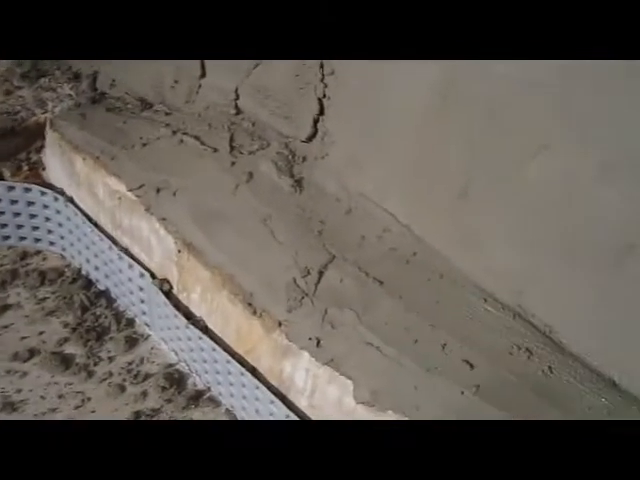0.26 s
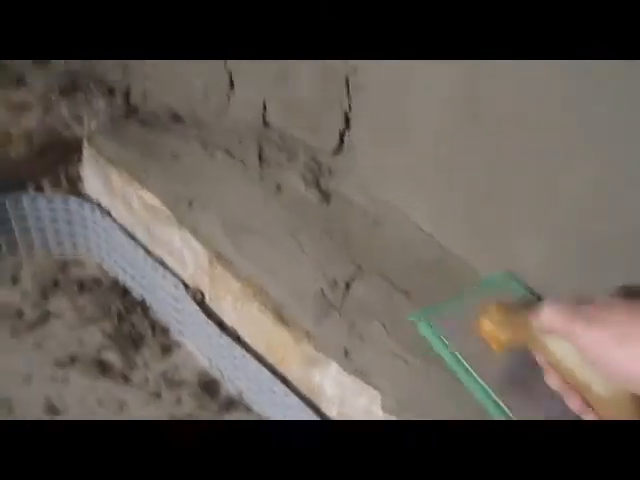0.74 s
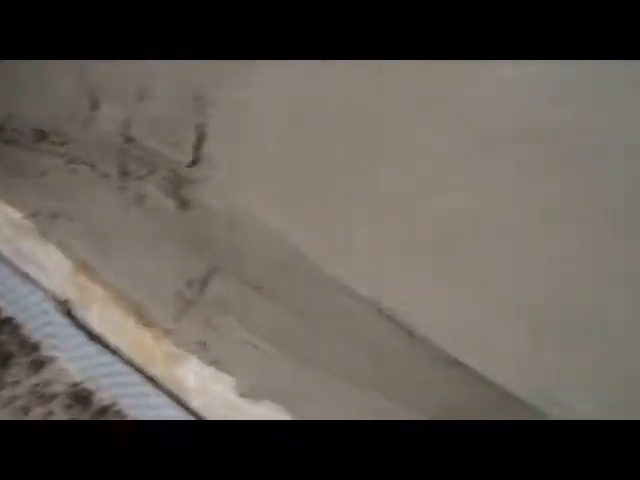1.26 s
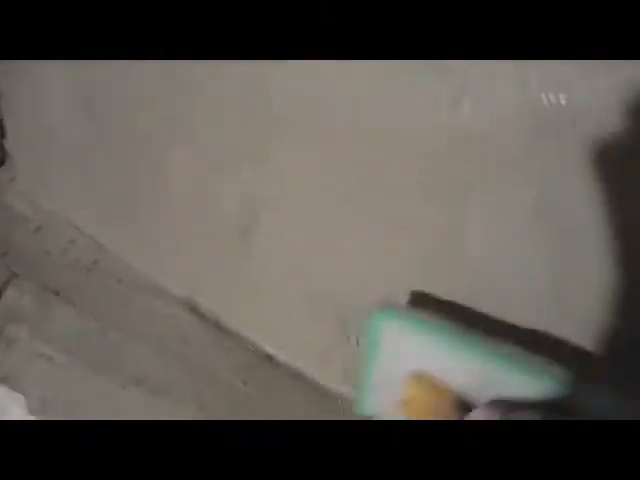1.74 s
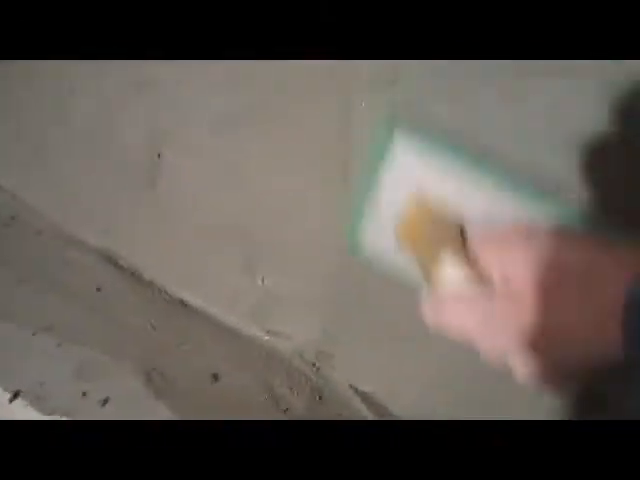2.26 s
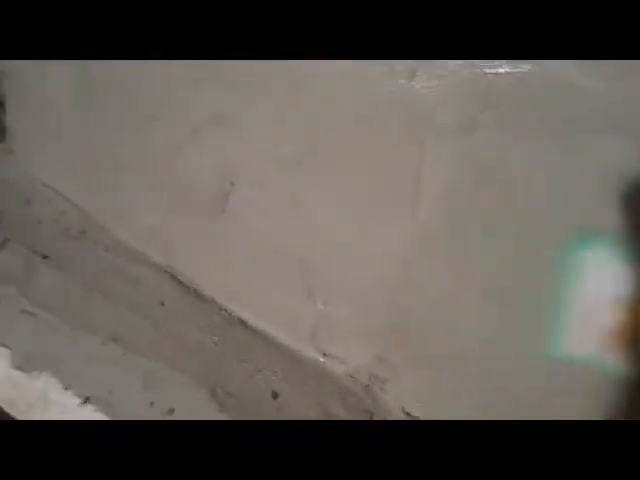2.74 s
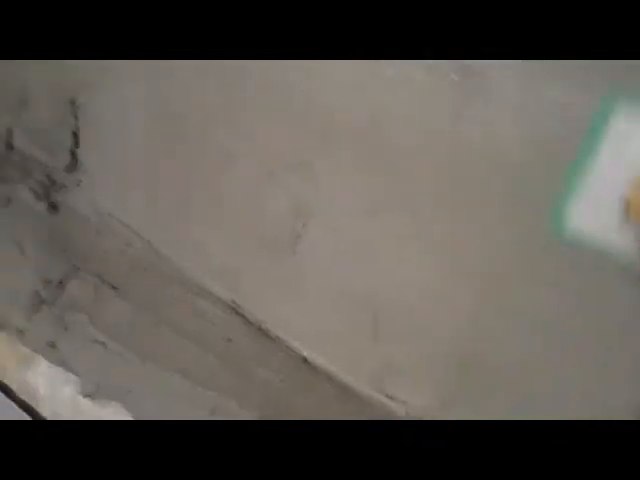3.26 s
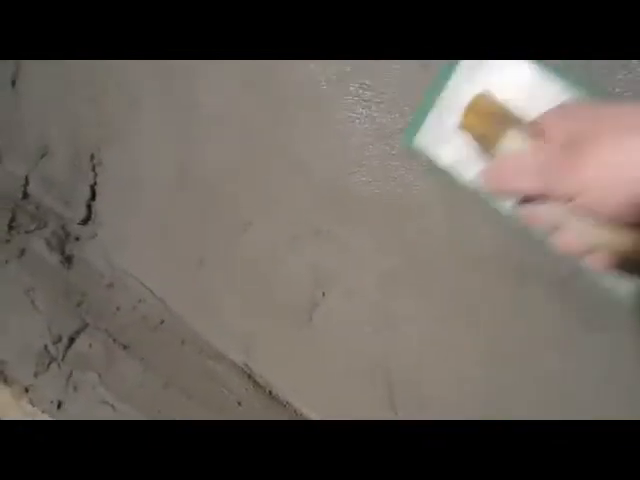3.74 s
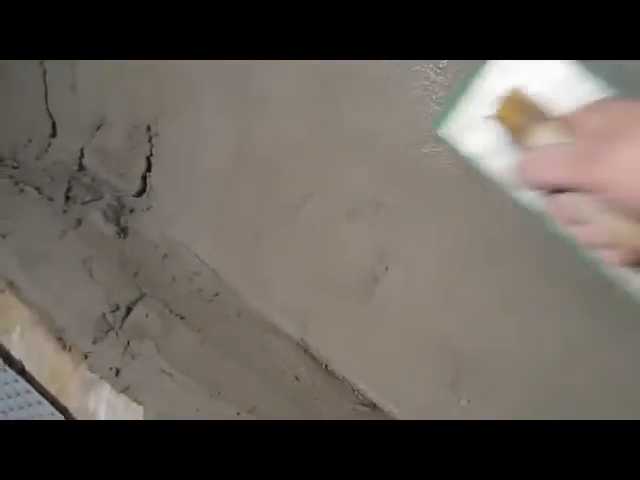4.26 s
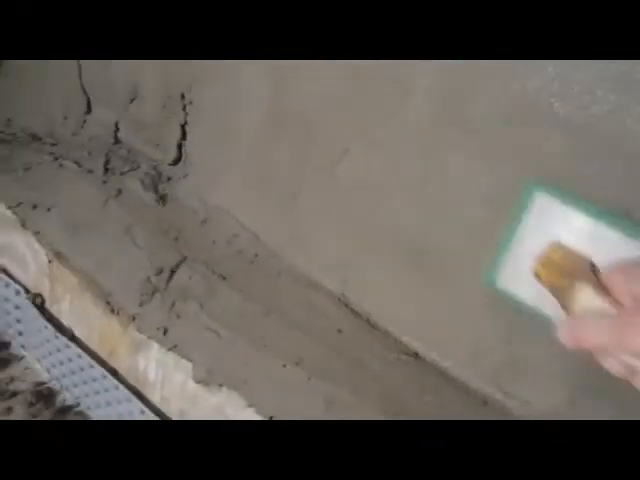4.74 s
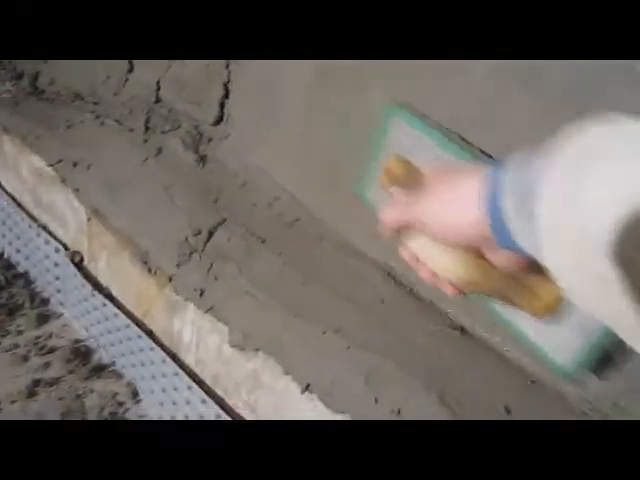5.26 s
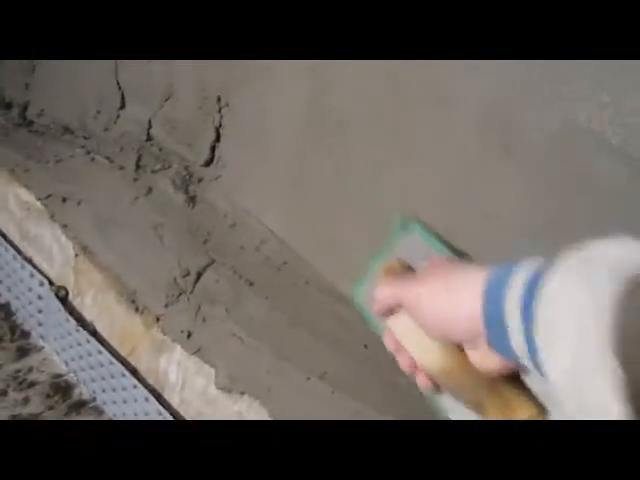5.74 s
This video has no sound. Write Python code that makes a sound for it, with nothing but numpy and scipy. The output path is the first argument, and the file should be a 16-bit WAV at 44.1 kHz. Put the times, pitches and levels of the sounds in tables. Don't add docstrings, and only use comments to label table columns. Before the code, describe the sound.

Close to a small mono microphone outdoors, a sponge float rubs wet cement in uneven sandy strokes. A thin wavering squeak comes first, then dry edge knocks and heavier scrapes. Steadier swishing circles follow, until a loud, crackling gust batters the microphone and nearly hides the rubbing. Quiet scraping returns at the end.

```python
import sys
import numpy as np
from scipy import signal
from scipy.fft import rfft, irfft, next_fast_len
from scipy.io import wavfile
from scipy.ndimage import uniform_filter1d

SR = 44100
rng = np.random.default_rng(int(sys.argv[2]) if len(sys.argv) > 2 else 0)


def elevation(decibels):
    levels = np.asarray(decibels, float)
    return 10 ** (levels / 20)


def dump_mix(stems):
    frames = np.atleast_2d(stems).T
    limited = np.clip(frames, -1, 1)
    pcm = np.round(limited * 32767).astype(np.int16)
    wavfile.write(sys.argv[1], SR, pcm)


N = 264732
T = np.arange(N) / SR
STEP = T[::64]


def unit(x):
    return x / np.sqrt(np.mean(x ** 2))


def curve(table):
    s, *columns = np.transpose(table)
    return [np.interp(T, s, c) for c in columns]


def colour(table, hz):
    f, db = np.transpose(table)
    return np.interp(np.log(hz), np.log(f), db)


def band(x, hz, width, order=2):
    edges = [hz - width / 2, min(hz + width / 2, .45 * SR)]
    return signal.sosfilt(signal.butter(order, edges, "band", fs=SR, output="sos"), x)


def walk(rate):
    k = int(SR / rate)
    held = np.repeat(rng.standard_normal(N // k + 1), k)
    return 1.57 * uniform_filter1d(uniform_filter1d(held, k), k)[:N]


def add(out, s, piece):
    i = int(s * SR)
    out[i:i + len(piece)] += piece[:N - i]


# (middle [s], length [s], grit peak [dB], press:
# thick drag over the grit [dB], plate ring over the grit [dB])
STROKES = [(0.094, 0.1, -42.5, -17, -17), (0.214, 0.2, -39, -13, -3), (0.41, 0.062, -41, -21, -9),
           (0.636, 0.076, -45.5, 6.5, 3), (0.712, 0.11, -68.5, 10, 20), (0.854, 0.068, -51, 6, 5),
           (0.982, 0.1, -41, -13.5, -2), (1.077, 0.16, -39, -32, -1), (1.196, 0.067, -40.5, -21, -3),
           (1.275, 0.092, -47.5, -5, 5.5), (1.392, 0.07, -29.5, -4, 1), (1.452, 0.063, -34.5, 8.5, 5),
           (1.493, 0.085, -25.5, -5.5, -3), (1.583, 0.1, -46.5, 2, 6.5), (1.691, 0.039, -50.5, 5, 10),
           (1.723, 0.049, -36.5, 4, 8), (1.761, 0.066, -48.5, 7, 9), (1.87, .09, -54.5, 3, -5),
           (1.98, 0.069, -42, -16, -4), (2.23, 0.22, -33, -12.5, -8), (2.4, 0.14, -43, -9, 1),
                (2.54, 0.084, -34.5, -7.5, -12), (2.67, 0.14, -35.5, -15, -3.5),
                (2.95, 0.12, -37.5, -21, -2), (3.071, 0.12, -32.5, -21, 0), (3.2, 0.094, -34.5, -20, -2.5),
                (3.412, 0.22, -36, -21, -4.5), (3.608, 0.096, -41, -19, 6), (3.82, 0.16, -38, -15, -13),
                (3.99, 0.15, -34, -22, -2), (4.228, 0.17, -35.5, -20, -5.5), (4.44, .2, -37.5, -20, -5),
                (4.66, 0.2, -38.5, -14.5, -8), (4.86, 0.1, -46, 4.5, -7), (5.771, 0.094, -63, 1, 6),
                (5.85, 0.095, -46, -9, -14), (6.0, 0.12, -42, -3.5, -9.5)]
# (time [s], grit level [dB], press [dB])
CONTACT = [(0, -45, 0), (.45, -43, -6.5), (.55, -50, 1.5), (.77, -58, 5.5), (.9, -47, -4.5),
           (1.3, -46.5, 6), (1.66, -56, 8), (1.87, -50.5, 2.5), (2.04, -41, -8), (2.8, -41.5, -14),
           (4.8, -46.5, -17.5), (4.98, -54.5, -25), (5.24, -58.5, -11), (5.43, -52.5, -14),
           (5.53, -67.5, -4), (5.67, -71.5, 14), (5.78, -51, -5), (6.0, -64, 18)]


def strokes():
    rise_share, spray_length = 0.9, 0.86
    spray_per_press = -0.3
    db, press = (c[::64] for c in curve(CONTACT))
    spray = -6.5 + spray_per_press * press + 0.19 * (db + 45.0)
    power = elevation(2 * (db + np.array([press, 0 * db - 2.5, 0 * db, spray])))
    for s, length, db, press, ring in STROKES:
        u = 2 * (STEP - s) / length / np.where(STEP < s, rise_share, 2 - rise_share)
        bell = np.exp(-u ** 2)
        bells = [bell, bell, bell, bell ** (1 / spray_length ** 2)]
        spray = -12 + spray_per_press * press - 0.33 * (db + 37.5) + 0.16 * (ring + 4)
        power += elevation(2 * (db + np.array([[press], [ring], [0], [spray]]))) * bells
    return np.array([np.interp(T, STEP, 10 * np.log10(p)) for p in power])


RUB_HZ = (280, 1500, 5500, 12000)
RUB_WIDTH_HZ = (480, 1800, 5500, 5000)
# (frequency [Hz], level [dB])
GRIT = [(60, -14.5), (120, -8), (280, 0.5), (600, 0), (1300, 2.5), (2500, 1), (4000, 2), (7000, 3.5),
        (10000, 3), (12500, 2), (14000, -5), (15300, -8.5)]


def rub(layers_db, patchy_db=1.36, patch_rate=12.):
    per_hz = layers_db - 10 * np.log10(RUB_WIDTH_HZ)[:, None]
    size = next_fast_len(N)
    noise = rng.standard_normal(N)
    bursts_db = 1.5 * rng.exponential(1, N) + .8 * walk(60)
    grains = rfft(n=size, x=unit(noise * elevation(bursts_db)))
    octave = np.log2(np.maximum(np.arange(len(grains)), 1) * SR / size)
    out, shared = 0, walk(19.0)
    for hz in 60 * 2 ** np.arange(0, 8.1, .25):
        place = np.interp(np.log(hz), np.log(RUB_HZ), range(4))
        k = min(int(place), 2)
        layer_db = per_hz[k] + (place - k) * (per_hz[k + 1] - per_hz[k])
        db = layer_db + colour(GRIT, hz) + 10 * np.log10(SR / 2)
        shared = 0.51 * shared + 0.82 * walk(patch_rate)
        slot = np.maximum(1 - 4 * abs(octave - np.log2(hz)), 0)
        out = out + elevation(db + patchy_db * shared) * irfft(grains * slot, size)[:N]
    return out


def pores(grit_db, count=700, under_db=-17., glide=.04):
    out = np.zeros(N)
    for s, pitch, long, bend, size in rng.random((count, 5)):
        t = T[:int(SR * (.02 + .05 * long))]
        hz = 500 * 2 ** (4.8 * pitch) * (1 + glide * (2 * bend - 1) * t / t[-1])
        whistle = np.hanning(len(t)) * np.sin(2 * np.pi * np.cumsum(hz) / SR)
        add(out, s * N / SR, elevation(3.3 * size) * whistle)
    return out * elevation(grit_db + under_db)


# (frequency [Hz], level [dB per Hz])
AIR = [(12, -37), (20, 9.5), (128, -3), (288, -13), (316, -9), (392, -10), (500, -3.5), (650, -38),
       (1100, -120)]
# (time [s], level [dB])
DUCK = [(0, 1), (2.55, 1.5), (2.75, 3.5), (3.4, 3.5), (3.9, 4), (4.2, 2.5), (4.5, 1.5), (4.8, 4),
        (4.9, -13.5), (5.62, -15), (5.76, -5.5), (6.01, -4)]


def air():
    hz = np.maximum(np.arange(N // 2 + 1) * SR / N, 1)
    rumble = irfft(rfft(rng.standard_normal(N)) * elevation(colour(AIR, hz)), N)
    return unit(rumble) * elevation(-53 + curve(DUCK)[0] + 1.5 * walk(8.))


# (middle [s], length [s], frequency [Hz], level [dB], glide [octaves per s])
RINGS = [(0.07, 0.038, 1700, -42, -0.8), (0.07, 0.14, 373, -47, -0.7), (0.162, .12, 1397, -41.5, 1.7),
         (0.941, 0.19, 4220, -43, 1.5), (1.06, 0.16, 6500, -41, -0.5), (1.296, 0.027, 3060, -32.5, -2),
         (1.365, 0.029, 1520, -33, -3.5), (1.394, 0.072, 3116, -24.5, 0), (1.408, 0.032, 3850, -27, 0.5),
         (1.5, 0.08, 559, -35, 0.5), (1.492, 0.25, 924, -31, -.3), (1.721, 0.059, 2020, -38, 4),
         (1.752, 0.11, 453, -34, -0.1), (1.959, 0.14, 1595, -47, 1.5), (2.171, 0.12, 4600, -38, -2),
         (2.223, 0.057, 2270, -40, 3.5), (2.25, 0.1, 1268, -38.5, -0.2), (2.309, 0.077, 3300, -36, 0),
         (2.46, 0.1, 3900, -48, -1), (2.65, 0.048, 2160, -42, 3), (2.664, 0.092, 3930, -34, 4),
         (3.005, 0.19, 2415, -36.5, 0), (3.03, 0.06, 4000, -31.5, -0.5), (3.089, 0.065, 3010, -33.5, 1.5),
         (3.122, 0.22, 1199, -40.5, 2.5), (3.158, 0.052, 6750, -33.5, 2), (3.39, 0.06, 2720, -38, -1),
         (3.454, 0.096, 1300, -41, -.7), (3.612, 0.13, 1410, -46, 1), (3.821, 0.12, 3110, -40, 1),
         (3.92, 0.2, 1605, -40.5, 0.5), (3.96, .1, 3100, -46, 1), (4.0, 0.086, 5320, -42, 2.5),
         (4.165, 0.11, 2070, -37.5, .7), (4.186, 0.076, 2910, -36, 0.5), (4.345, 0.05, 1600, -36.5, 0.5),
         (4.377, 0.12, 3420, -38, 2.2), (4.474, 0.16, 6000, -40, 0.5), (4.63, 0.13, 1510, -43, .1),
         (5.795, 0.13, 1424, -48, .1)]
PATCHES = [(.62, .05, 770, -45, -1.5), (.64, .04, 330, -39, 0), (.652, 0.026, 1520, -38, 0),
           (1.42, .03, 402, -28, 0.5), (1.52, 0.064, 720, -34, 0), (1.739, .05, 600, -35, -6.5),
           (1.72, .04, 249, -38, 0), (2.226, .04, 1280, -37.5, 1), (2.278, .03, 1250, -36, 0),
           (2.705, .03, 1250, -40, 0.5), (2.98, .05, 2450, -42, -0.5), (3.08, 0.041, 1002, -40, 0.5),
           (3.382, .04, 2000, -40, -0.5), (3.599, 0.073, 1304, -40, 0), (3.905, .035, 1600, -36, -1),
           (4.02, .04, 1500, -45, 1), (4.097, .025, 1200, -40, 0), (4.211, 0.085, 1350, -42, 0),
           (4.22, 0.053, 1800, -40, 0), (4.34, .05, 1200, -42.5, 1), (4.51, 0.088, 1700, -42.5, 0.5),
           (5.783, 0.026, 1450, -51, -2.5), (5.824, 0.0346, 1400, -50, -3.5), (5.98, .05, 800, -45, 1),
           (5.904, 0.13, 330, -49, 0), (.03, 0.055, 340, -44, 0.5), (3.78, 0.13, 4620, -45, -0.5),
           (1.303, .1, 3300, -43, 0)]
WHISTLES = [(0.15, .05, 5600, -46, -2), (0.2, .06, 5600, -44, 0), (.27, .03, 5900, -46, 2),
            (0.18, .1, 3800, -49, 0), (2.65, 0.045, 2150, -40, 0), (4.46, .05, 6400, -45, 1),
            (4.515, .04, 6050, -45, -1), (4.64, .08, 1500, -45, 0.5), (4.385, .04, 3350, -45, -0.5)]


def rings(grit_db, table, sharp=7., lift_db=-1.5, flicker_db=2.):
    out = np.zeros(N)
    for s, length, hz, db, glide in table:
        i, n = int(max(s - length, 0) * SR), int(2 * length * SR)
        t = T[:n] - length
        narrow = signal.butter(2, hz / sharp / 2, fs=SR, output="sos")
        sway = signal.sosfilt(narrow, rng.standard_normal((2, 24000)))[:, -n:]
        phase = 2 * np.pi * np.cumsum(hz * 2 ** (glide * t)) / SR
        hiss = unit(sway[0] * np.cos(phase) + sway[1] * np.sin(phase))
        hiss = (hiss * np.hanning(n) ** 1.4)[:N - i]
        stroke_db = np.minimum(grit_db[i:i + n] - grit_db[int(s * SR)], 0)
        add(out, i / SR + 1e-6, elevation(db + lift_db + stroke_db) * hiss)
    return out * elevation(flicker_db * walk(45.))


# (time [s], slip rate [Hz], level [dB])
SQUEAKS = [
    [(.06, 2660, -60), (.08, 2700, -46), (.126, 2790, -43), (.165, 2820, -44), (.188, 2930, -43),
     (.21, 2790, -44), (.235, 2830, -43), (.27, 2780, -45), (.3, 2680, -43), (.335, 2430, -43),
     (.365, 2520, -45), (.38, 2600, -56), (.41, 2750, -52), (.46, 3000, -56)],
    [(1.8, 4300, -70), (1.835, 4750, -60), (1.86, 5250, -57), (1.89, 5500, -56), (1.93, 5330, -60)],
    [(5.64, 5500, -86), (5.66, 5900, -77), (5.695, 6600, -69), (5.73, 7050, -70), (5.76, 7350, -74)],
    [(5.87, 1280, -78), (5.91, 1380, -62), (5.965, 1500, -58), (6.0, 1470, -60)],
]
# (first [dB], second [dB], higher overtones [dB], half lines [dB])
SQUEAK_TONES = [(0, -2, -30, -10), (-3, 2, -5, -4), (0, -16, -30, -60), (-18, -13, 0, -60)]


def squeaks(rough=.006, flutter_db=3.5):
    out = 0
    for table, tones in zip(SQUEAKS, SQUEAK_TONES):
        hz, db = curve(table)
        phase = 2 * np.pi * np.cumsum(hz * (1 + rough * walk(300.))) / SR
        on = (T > table[0][0]) & (T < table[-1][0])
        for k in np.arange(1, int(31000 / hz.max()) + 1) / 2:
            tone_db = tones[3 if k % 1 else min(int(k), 3) - 1]
            out = out + on * elevation(db + tone_db + flutter_db * walk(70.)) * np.sin(k * phase)
    return out


# (time [s], lowest [Hz], highest [Hz])
FILLS = [(.295, 4700, 6300), (1.225, 4700, 6300), (1.225, 11800, 13700), (2.105, 8400, 9700),
         (2.76, 6300, 8300), (3.715, 9000, 10300), (4.755, 4200, 5200), (4.755, 5700, 6900),
         (4.755, 11200, 12400), (4.755, 13900, 15100)]


def fills():
    length_s = .046
    out, n = np.zeros(N), int(length_s * SR)
    for s, low_hz, high_hz in FILLS:
        noise = rng.standard_normal(3 * n)
        hiss = unit(band(noise, (low_hz + high_hz) / 2, high_hz - low_hz, order=6)[-n:])
        db = -43. - low_hz / 1000
        add(out, s - length_s / 2, elevation(db) * hiss * np.sqrt(np.hanning(n)))
    return np.array([out, -out])


# (time [s], ring peak [dB], ring [Hz], thud peak [dB], thud [Hz])
TAPS = [(.488, -24, 1350, -54, 200), (.525, -37, 3900, -60, 200), (.537, -32.5, 2730, -55, 200),
        (0.546, -37, 2600, -60, 200), (.568, -35.5, 3400, -60, 200), (0.649, -20.5, 1320, -21, 123),
        (.674, -26.5, 2500, -30, 149), (.695, -25.5, 1370, -50, 150), (.718, -27, 1390, -34, 150),
        (0.727, -35, 1400, -53, 150), (.734, -35, 1500, -55, 150), (0.816, -14.5, 1315, -53, 300),
        (1.342, -21, 2600, -24, 251), (1.362, -22, 1520, -40, 250), (1.41, -11, 1260, -13, 310),
        (1.465, -20, 1360, -14, 182), (1.648, -29, 2200, -45, 400), (1.681, -33, 2300, -45, 400),
        (1.722, -22, 2210, -25, 460), (4.174, -35, 700, -27.5, 338), (4.555, -32, 755, -26, 184)]
# (time [s], level [dB], lowest [Hz], highest [Hz])
TICKS = [
    (1.677, -45, 6000, 14000),
    (5.535, -39, 3000, 8500),
]


def taps():
    t60_s, push_s, tick_s = 0.0076, 0.0004, .003
    out, t = np.zeros(N), T[:4000]
    for s, db, hz, thud_db, thud_hz in TAPS:
        fade = np.exp(-np.log(1000) * t / t60_s)
        ring = -2.5 * fade * np.sin(2 * np.pi * hz * t)
        overtone = -1.54 * np.exp(-t / 0.00062) * np.sin(2 * np.pi * 1.77 * hz * t)
        tail = 0.13 * np.exp(-t / 0.025) * unit(band(rng.standard_normal(len(t)), hz, 0.53 * hz))
        thud = -np.exp(-t * thud_hz / 0.9) * np.sin(2 * np.pi * thud_hz * t)
        push = 1 - np.exp(-t / push_s)
        add(out, s, elevation(db) * (ring + overtone + tail) * push + elevation(thud_db + 1.0) * thud)
    for s, db, low_hz, high_hz in TICKS:
        crack = band(rng.standard_normal(len(t)), (low_hz + high_hz) / 2, high_hz - low_hz)
        swell = t / tick_s * np.exp(1 - t / tick_s * 2) * 3
        add(out, s - tick_s, elevation(db) * crack * swell)
    return out


def add_eddy(out, s, db, width_ms, turn):
    u = np.arange(-6, 6, 1000 / SR / max(width_ms, .04))
    add(out, s - 0.00582 * width_ms, elevation(db) * np.sin(0.89 * u + turn) / np.cosh(1.33 * u) ** 0.93)


def peaks(events, rise, fall):
    power = sum(elevation(2 * (db - np.maximum(rise * (s - STEP), fall * (STEP - s)))) for s, db in events)
    return np.interp(T, STEP, 10 * np.log10(power + 1e-12))


# (time [s], level [dB], whirl width [ms])
GUST = [
    [(4.8, -44, 1.6), (4.86, -16.5, 1.05), (5.03, -27.5, 1.03), (5.1, -22.5, 0.6), (5.354, -20.5, 0.76),
     (5.374, -25, 0.72), (5.452, -20.5, 1.23), (5.48, -54, 1.6)],
    [(5.503, -53, 1.3), (5.516, -22, 1.1), (5.564, -23.5, 0.85), (5.594, -25, 1.3), (5.61, -44, 1.5),
     (5.628, -38, 1.2), (5.66, -70, 2)],
]
# (time [s], peak [dB])
SURGES = [(4.878, -16), (4.938, -8.5), (4.992, -9.5), (5.082, -19)]
# (time [s], peak [dB], width [ms])
EDDIES = [(4.8784, -10.5, 0.56), (4.8815, -8.5, 0.5), (4.895, -15, 0.41), (4.9014, -9.5, 0.72),
          (4.925, -21.8, 0.61), (4.931, -16, 0.67), (4.9363, -8.5, 0.4), (4.942, -26, 0.46),
          (4.9532, -10, 0.52), (4.979, -11.5, 0.33), (4.989, -17, 0.56), (4.9949, -9, 0.24),
          (5.0051, -16, 0.23), (5.019, -3.5, 0.32), (5.026, -24, 0.47), (5.0445, -13, 0.26),
          (5.048, -4, 0.21), (5.0576, -18.4, 0.38), (5.0655, -12.5, 0.28), (5.0719, -13.1, 0.24),
          (5.077, -23, 0.41), (5.083, -8, 0.27), (5.0876, -19, 0.27), (5.1002, -23, 0.37),
          (5.112, -19, 0.26), (5.1214, -14.5, 0.25), (5.1297, -22, 0.38), (5.134, -20.8, 0.21),
          (5.1493, -21.3, 0.31), (5.153, -19, 0.27), (5.1576, -12.5, 0.29), (5.1622, -14, 0.34),
          (5.1767, -23, 0.49), (5.189, -6.5, 0.29), (5.1987, -12.5, 0.33), (5.2041, -11, 0.15),
          (5.2076, -26, 0.33), (5.22, -24, 0.45), (5.226, -18, 0.23), (5.23, -13.5, 0.19),
          (5.2352, -16, 0.23), (5.2431, -20, 0.22), (5.247, -17, 0.26), (5.2556, -13, 0.26),
          (5.2603, -17, 0.22), (5.2675, -7.5, 0.18), (5.2734, -21, 0.29), (5.2891, -18, 0.45),
          (5.3023, -21, 0.28), (5.308, -16.5, 0.24), (5.3167, -20, 0.35), (5.3368, -15, 0.36),
          (5.3417, -9.5, 0.25), (5.3495, -22, 0.48), (5.355, -18, 0.46), (5.3711, -16.5, 0.34),
          (5.4087, -19.2, 0.33), (5.4441, -18.5, 0.24)]
LATE_EDDIES = [(4.887, -12.5, 0.49), (4.89, -13, .45), (5.394, -22, 0.66), (5.419, -24, .8),
               (5.536, -30, 0.3), (5.543, -26, 0.46), (5.551, -21, 0.41), (5.561, -16, 0.5),
               (5.578, -25.5, 0.58)]
# (time [s], peak [dB], width [ms])
SNAPS = [(4.9975, -8, .27), (5.019, -12, 0.13), (5.0456, -14, 0.26), (5.047, -12, 0.2),
         (5.0483, -1.5, 0.15), (5.0755, -25, .15), (5.0865, -22, 0.2), (5.118, -25, .15),
         (5.1865, -13, .24), (5.1883, -17, 0.13), (5.2041, -19, 0.13), (5.2285, -20, .18),
         (5.233, -24, .18), (5.2676, -14, .14), (5.272, -17, 0.15), (5.338, -25, .14), (5.394, -27, .3),
         (5.522, -25, 0.6), (5.55, -25, 0.45)]


def gust(rate=500., spread_s=0.00246, follow_db=-3.0):
    slow, out = np.zeros(N), np.zeros(N)
    sharp = EDDIES + LATE_EDDIES
    db, width_ms = curve(GUST[0] + GUST[1])
    db = np.maximum(db, peaks(SURGES, 703, 501))
    wake_db = peaks([row[:2] for row in sharp], 1300., 1300.)
    db = db + 0.32 * (np.maximum(wake_db, -28.5) + 20.5)

    chance = rng.random((700, 4))
    times = GUST[0][0][0] + np.cumsum(-np.log(chance[:, 0])) / rate
    for s, (_, size, wide, turn) in zip(times, chance):
        if s < GUST[1][-1][0]:
            width = width_ms[int(s * SR)] * 2 ** (2.34 * (wide - .4))
            add_eddy(slow, s, 10. * size, width, 2 * np.pi * turn)
    slow /= np.sqrt(uniform_filter1d(slow ** 2, 1500) + .01)

    for (s, peak_db, width), draw in zip(sharp, rng.standard_normal((len(sharp), 12))):
        add_eddy(out, s, peak_db + 7.0, 1.19 * width, np.pi / 2 * np.sign(draw[0]) + .5 * draw[1])
        for late, size, wide, turn in draw[4:].reshape(2, 4):
            follow_s = s + spread_s * np.clip(abs(late) + 0.35, 0, 2.5)
            follow_width = width * 2 ** (.5 * abs(wide) + 0.12)
            add_eddy(out, follow_s, peak_db + follow_db + 1.3 * size, follow_width, 9 * turn)
    for s, peak_db, width in SNAPS:
        add_eddy(out, s, peak_db, width, np.pi / 2 * np.sign(out[int(s * SR)]))
    flow = out + slow * elevation(db)
    return flow - 0.28 * band(flow, 140., 71, order=1)


def ripple(burst_db=8.0, burst_rate=220.0, under_db=-8.0):
    puffs = burst_db * walk(burst_rate)
    noise = rng.standard_normal((2, N))
    dull = unit(band(noise[0], 850.0, 780.0, order=4))
    bright = unit(band(noise[1], 1670.0, 1300., order=5))
    sharp = [(s, db - 19 - 33 * width) for s, db, width in EDDIES + LATE_EDDIES]
    level = elevation(peaks(sharp, 902, 1203) + under_db + puffs)
    return level * (dull + elevation(-16.5 + .5 * puffs) * bright)


def scene():
    layers_db = strokes()
    grit_db = layers_db[2]
    mono = rub(layers_db) + rings(grit_db, RINGS) + pores(grit_db)
    mono = mono + squeaks() + taps() + gust() + ripple() + air()
    mono = mono + rings(grit_db, PATCHES, sharp=8.0) + rings(grit_db, WHISTLES, sharp=44.0)
    return np.array([mono, mono])


def roll_off(x):
    return signal.sosfilt(signal.butter(12, 15450, fs=SR, output="sos"), x)


def record(dry):
    mic_gain, rail = .74, .7
    x = signal.sosfilt(signal.butter(2, 45., "high", fs=SR, output="sos"), mic_gain * dry)
    x = np.clip(x, -rail, rail)
    x = signal.sosfilt(signal.ellip(10, .2, 80, 15350, fs=SR, output="sos"), x)
    return roll_off(x + fills())


dry = scene()
out = record(dry)
dump_mix(out)
```